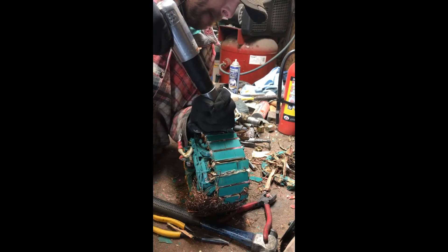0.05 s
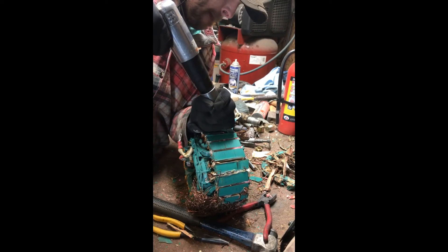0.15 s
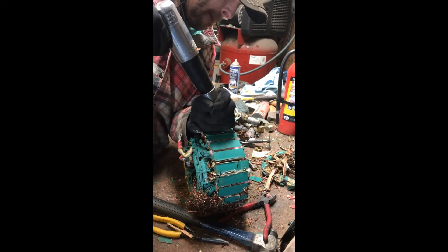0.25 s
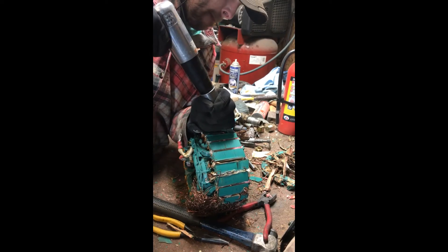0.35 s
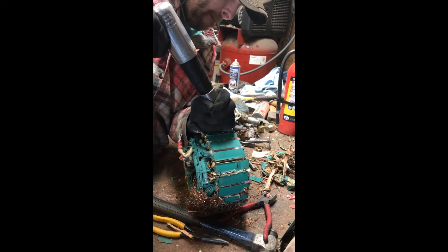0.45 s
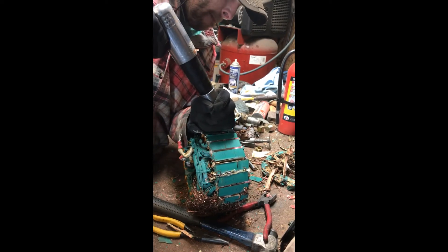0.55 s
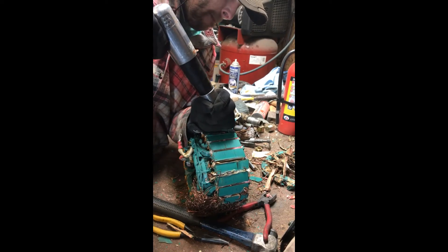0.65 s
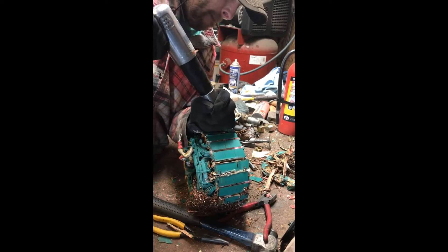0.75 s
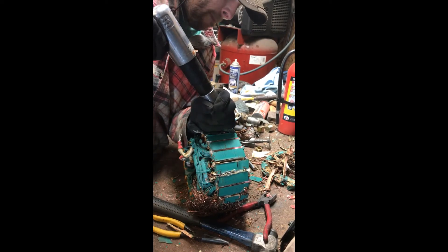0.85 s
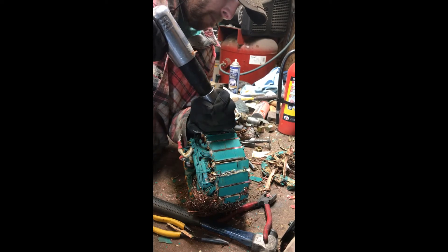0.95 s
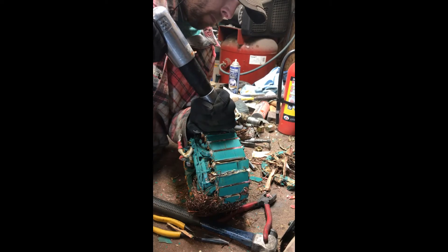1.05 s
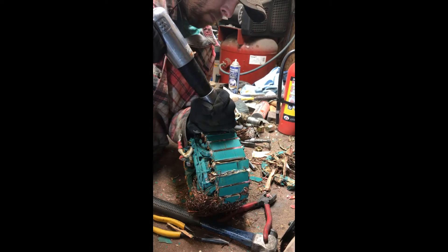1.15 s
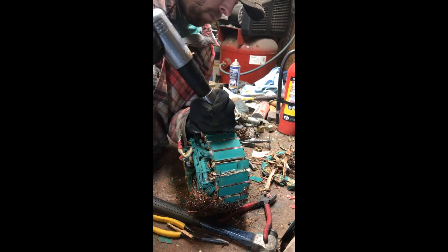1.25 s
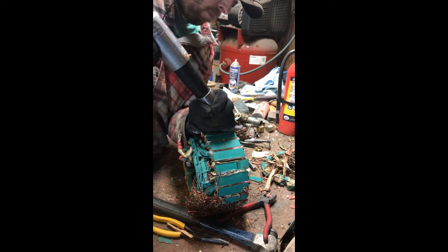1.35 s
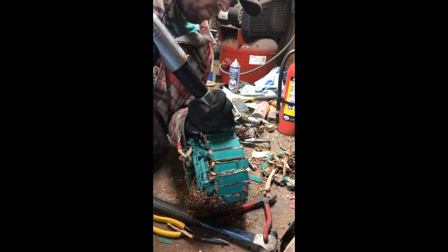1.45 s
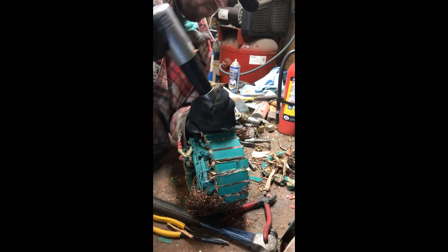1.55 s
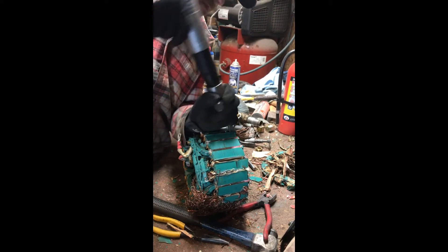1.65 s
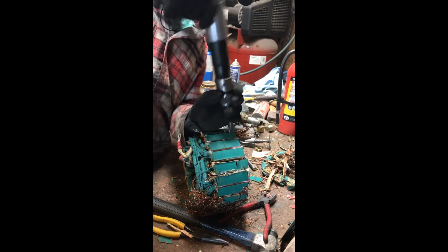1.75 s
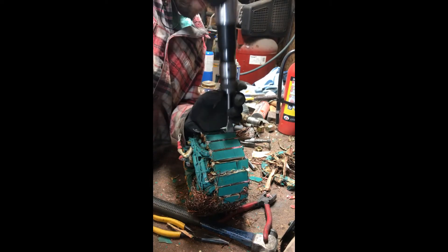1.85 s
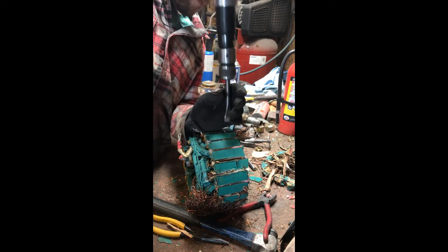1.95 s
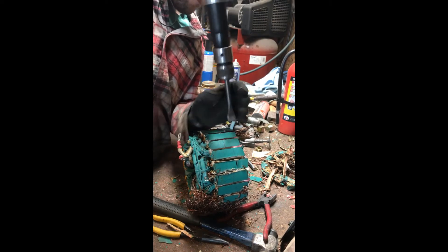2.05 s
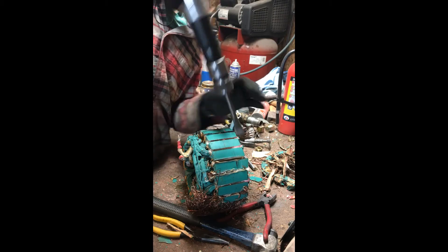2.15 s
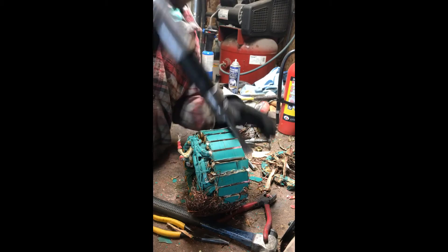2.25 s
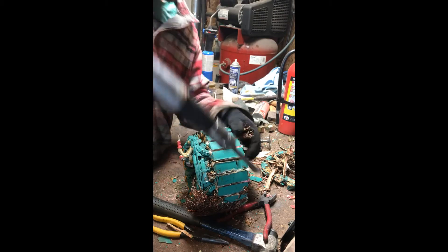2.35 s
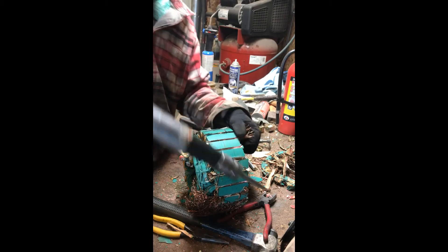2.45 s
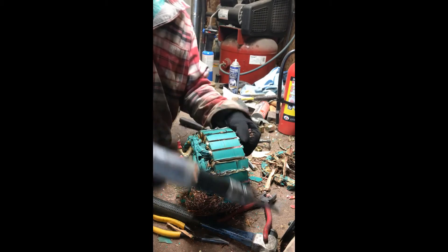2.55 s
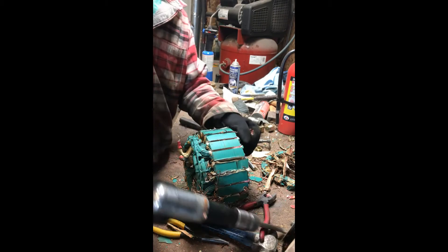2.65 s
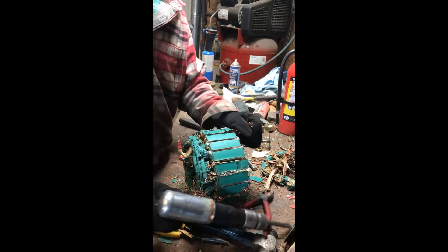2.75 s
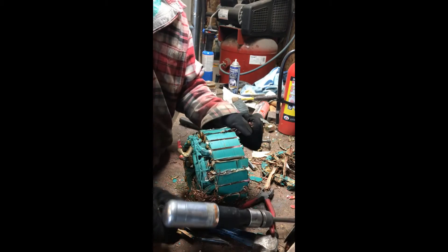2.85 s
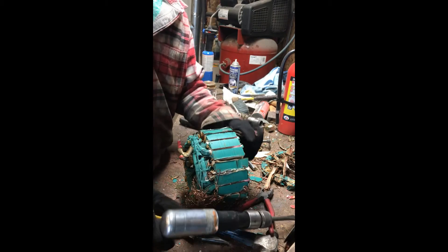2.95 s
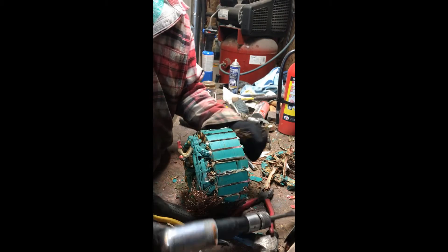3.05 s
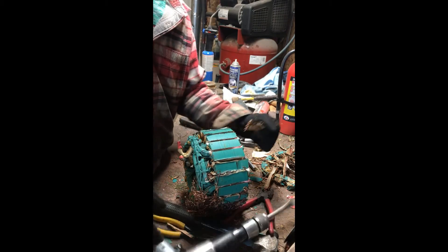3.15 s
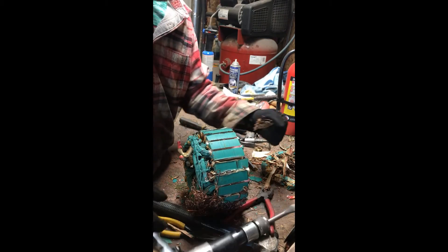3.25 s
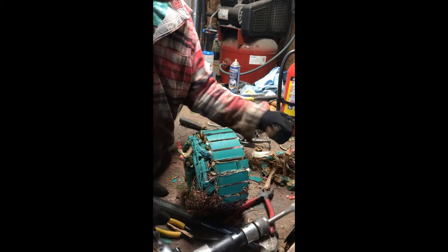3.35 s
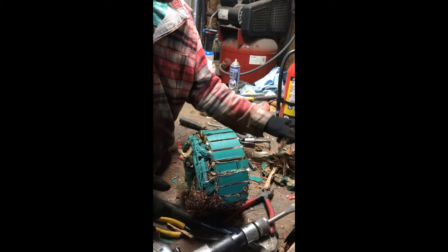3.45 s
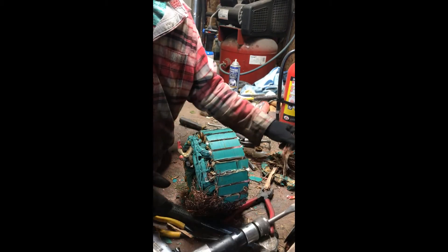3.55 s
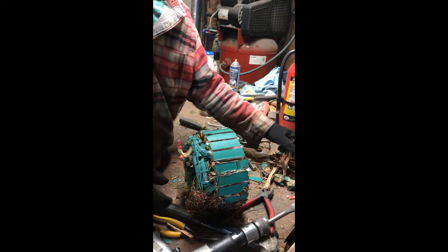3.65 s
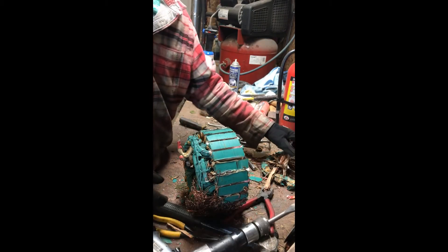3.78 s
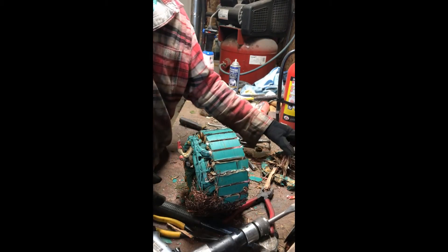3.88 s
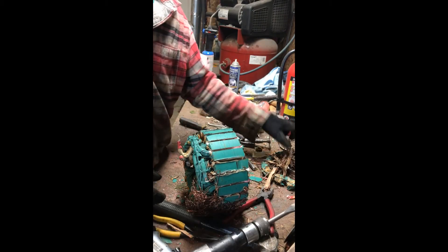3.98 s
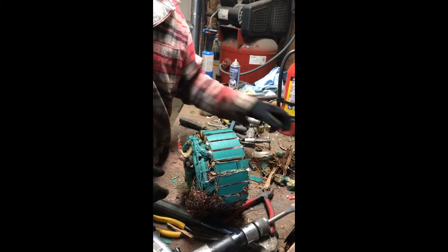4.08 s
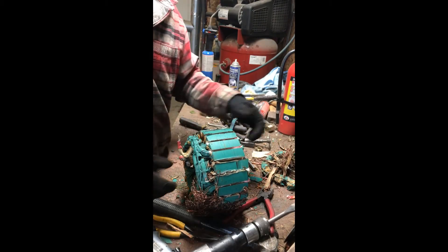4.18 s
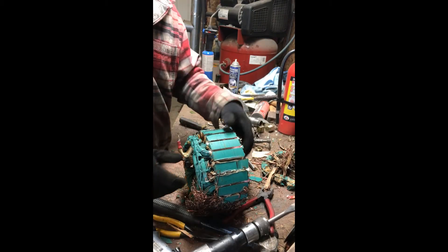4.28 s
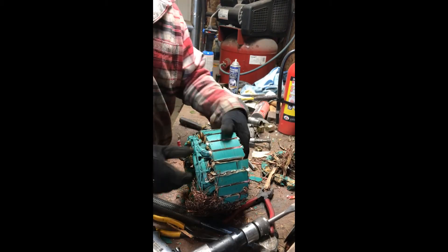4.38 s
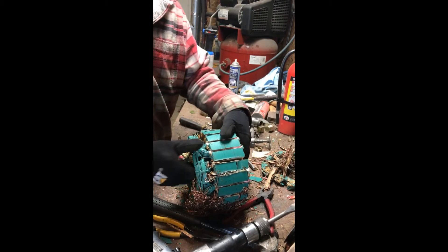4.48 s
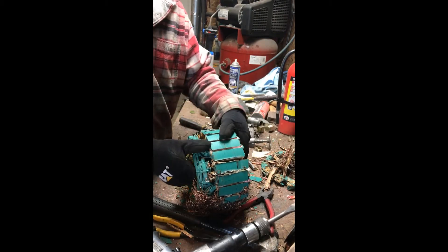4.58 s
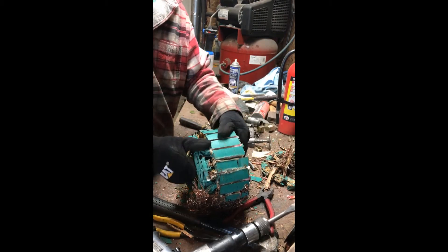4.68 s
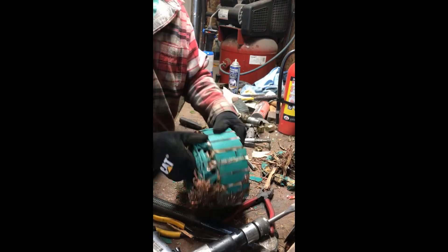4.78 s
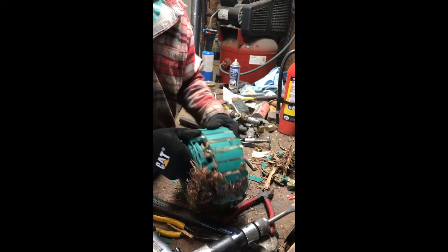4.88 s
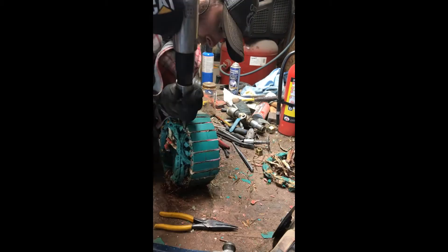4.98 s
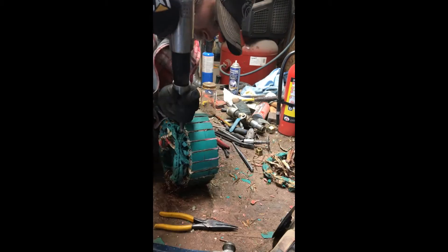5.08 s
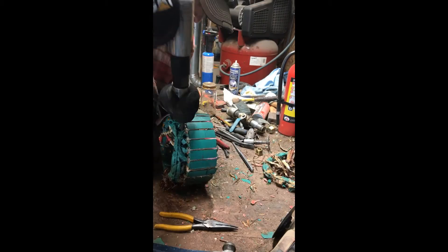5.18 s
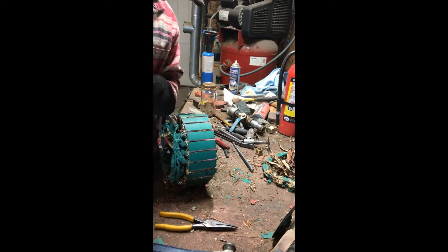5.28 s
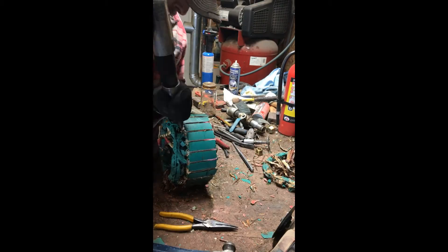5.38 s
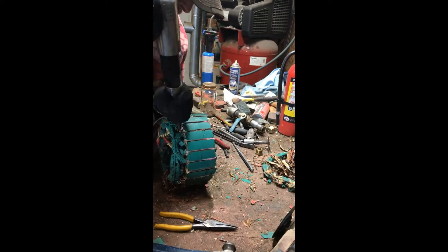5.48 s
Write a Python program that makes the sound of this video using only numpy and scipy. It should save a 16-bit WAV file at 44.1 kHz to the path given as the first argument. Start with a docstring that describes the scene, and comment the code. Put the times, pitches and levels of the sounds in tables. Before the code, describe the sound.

Loud, rapid pneumatic chiselling on metal windings stops abruptly; the tool clatters and thuds onto a wooden bench, then something heavy scrapes.

```python
"""An air hammer chatters against the copper windings of a motor stator on a workbench, then stops.
The loose chisel clinks in its holder, the tool is dragged and dropped on the bench, and the stator is shoved round.
Blows excite damped modes and decaying coloured noise; friction is a train of slips that rings the sliding body.
The workshop is small and dry, heard from close by; all sound ends just before five seconds."""
import sys
import numpy as np
from scipy import signal
from scipy.fft import rfft, irfft, next_fast_len
from scipy.io import wavfile
from scipy.ndimage import map_coordinates

SR = 44100
rng = np.random.default_rng(int(sys.argv[2]) if len(sys.argv) > 2 else 0)


def put_to_file(sound):
    """Save the sound as 16-bit audio at rate SR, in the file named by the first command-line argument."""
    columns = np.atleast_2d(sound).T  # one column per channel
    safe = np.clip(columns, -1, 1)
    whole_steps = np.round(safe * 32767)
    wavfile.write(sys.argv[1], SR, whole_steps.astype(np.int16))


N = 243429
TIME = np.arange(N) / SR  # s
AGE = np.arange(SR // 2) / SR  # s since a blow
BOOM_HZ = 66  # the bench's lowest mode
STROKE_SCATTER_DB = 0.9  # chance from stroke to stroke

# Dense ring of light metal contacts. Each row: frequency in Hz, relative density in dB per Hz.
CLACK_HIGH = [(2060, -51), (3500, -17), (4210, -10.5), (4540, -3.5), (5360, -8.5), (6280, -1.5),
              (7460, -4.5), (8580, -0.5), (9740, -8), (11900, -10.5), (13000, 0), (14100, -14.5),
              (16000, -10)]
# Dense ring of heavier metal contacts. Each row: frequency in Hz, relative density in dB per Hz.
CLACK_LOW = [(400, -14), (1200, -4), (2000, -4), (4000, -4.5), (6000, -14), (12000, -40.5)]


def amp(db):
    """Level to amplitude: 20 dB is a factor of ten."""
    return 10 ** (np.asarray(db) / 20)


def unit(x):
    """Normalisation: x scaled to rms 1."""
    return x / np.sqrt(np.mean(x ** 2) + 1e-20)


def along(points, hz):
    """Interpolation of (Hz, value) points on a logarithmic frequency axis."""
    f, v = np.transpose(points)
    return np.interp(np.log(hz + 1), np.log(f + 1), v)


def level(rows, axis=1):
    """Envelope: gain per sample from a dB column against time, silent outside the rows."""
    rows = np.asarray(rows)
    return amp(np.interp(TIME, rows[:, 0], rows[:, axis], left=-200, right=-200))


def colour(x, spectrum):
    """Linear filtering: x is weighted by a spectrum and scaled to rms 1."""
    size = next_fast_len(len(x))
    gain = amp(along(spectrum, np.fft.rfftfreq(size, 1 / SR)))
    return unit(irfft(rfft(x, size) * gain, size)[:len(x)])


def noise(spectrum, size=len(AGE)):
    """Coloured noise: white noise shaped by a spectrum, at rms 1."""
    return colour(rng.standard_normal(size), spectrum)


def wobble(rate):
    """Slow random modulation: a smooth curve through rate random knots a second."""
    knots = rng.standard_normal(int(N * rate / SR) + 4)
    return map_coordinates(knots, [TIME * rate])


def fade(t60, attack):
    """Exponential decay of 60 dB in t60 seconds, after a rise with time constant attack."""
    decay = np.exp(-np.log(1000) * AGE / max(t60, 1e-3))
    return decay * (1 - np.exp(-AGE / max(attack, 1e-5)))


def ring(modes, scatter_db, detune, attack, free=1):
    """Modal superposition: damped sines at scattered strengths and pitches; free scales the decay time."""
    total = 0
    for hz, db, t60 in modes:
        strength = amp(db + scatter_db * rng.normal())
        pitch = hz * (1 + detune * rng.normal())
        total = total + strength * fade(t60 * free, attack) * np.sin(2 * np.pi * pitch * AGE)
    return total


def add(track, s, sound):
    """Superposition: mix a sound into the track at s seconds."""
    start = max(round(s * SR), 0)
    track[start:start + len(sound)] += sound[:max(N - start, 0)]


def hammer():
    """Periodic impact: piston on chisel, tip into copper, rebound, exhaust puff, then the piston turns back."""
    # What every stroke rings in tool and stator. Each row: frequency in Hz, relative level in dB, t60 in s.
    body_modes = [(138.2, -5, 0.22), (166.2, -12, 0.22), (202.4, -5, 0.13), (234, -5.5, 0.079),
                  (284.2, 3, 0.049), (338, -25.5, 0.055), (486, -15, 0.16), (862, -9.5, 0.041),
                  (1193, -13, 0.042), (1307, -22, .04), (1851, -17.5, 0.089), (3540, -23, 0.065),
                  (3960, -20.5, 0.11), (12100, -14, 0.1)]
    # What the bite rings in the stator's iron. Each row: frequency in Hz, relative level in dB, t60 in s.
    iron_modes = [(404, -3, 0.073), (693.5, -8.5, 0.034), (935, -7.5, 0.068), (1196, -4.5, 0.11),
                  (1846, -0.5, .05), (2352, -7, 0.1), (3220, -7.5, 0.067), (3580, -6.5, 0.08),
                  (4150, -4.5, 0.086), (5270, -4, 0.13), (8380, -7.5, 0.076)]
    # Spectra of the strokes. Each row: frequency in Hz, relative density in dB per Hz.
    steel_blow = [(880, -26.5), (1500, -12), (1830, -1), (2120, -9.5), (2560, -11), (3590, -4), (4690, -11),
                  (6240, -3), (7610, -7.5), (8740, -2.5), (10300, -9.5), (12500, -3), (16000, -3)]
    copper_blow = [(150, -34), (400, 3.5), (600, -5), (720, -4.5), (880, 2.5), (1020, -2.5), (1250, 3),
                   (1900, -6), (2150, -8), (2450, -9.5), (4000, -5.5), (7000, -16.5), (16000, -26.5)]
    tip_bite = [(700, -20), (1500, -2), (2300, -9.5), (3800, -2.5), (5000, -5.5), (8000, -15.5),
                (16000, -17.5)]
    exhaust = [(300, -11.5), (900, 2.5), (2500, -3), (6500, -3), (9000, -3), (11000, -10.5), (16000, 1)]
    bite_s, rebound_s, return_s = 0.0037, 0.0059, 0.034  # after the piston lands

    out = np.zeros(N)
    steel, copper, bite, rebound, air = map(recurring, (steel_blow, copper_blow, tip_bite, steel_blow, exhaust))
    puff = np.exp(-0.5 * ((AGE - 0.018) / 0.004) ** 2)
    leak = np.exp(-0.5 * ((AGE - 0.028) / 0.012) ** 2)  # air that escapes later and more slowly
    puff = puff + amp(-7) * leak
    for s, db, thump_db, iron_db in strokes():
        add(out, s, amp(db - 1.5) * next(steel) * fade(t60=0.023, attack=0.0011))
        copper_db = -16.5 + STROKE_SCATTER_DB * rng.normal()
        add(out, s, amp(copper_db) * next(copper) * fade(t60=0.087, attack=0.002))

        # the tip's strike is a very short crack
        bite_db = 1 + 2 * rng.normal()
        add(out, s + bite_s, amp(bite_db) * next(bite) * fade(t60=0.0045, attack=0.00063))
        iron = ring(iron_modes, scatter_db=3, detune=0.003, attack=0.0003)
        add(out, s + bite_s, amp(iron_db) * iron)

        rebound_db = db - 5 + STROKE_SCATTER_DB * rng.normal()
        add(out, s + rebound_s, amp(rebound_db) * next(rebound) * fade(t60=0.018, attack=0.0008))
        add(out, s, amp(-23) * next(air) * puff)
        turn_back = amp(-31) * noise(CLACK_HIGH) * fade(t60=0.023, attack=0.0016)
        add(out, s + return_s + 0.0034 * rng.normal(), turn_back)

        # the recoil is alike every time, so the low modes build up on multiples of the stroke rate
        recoil = ring(body_modes, scatter_db=1.5, detune=0.001, attack=0.0008)
        add(out, s + 0.00073, -amp(thump_db + 4.5) * recoil)
        bench_boom = np.sin(2 * np.pi * BOOM_HZ * AGE) * fade(t60=0.47, attack=0.0021)
        add(out, s + 0.0024, -amp(-19) * bench_boom)
    return out


def strokes():
    """Phase integration: a stroke per whole turn, as (s, steel blow dB, recoil thump dB, iron ring dB)."""
    # The piston speeds up when the tool is leaned on, sags with the air pressure and slows as the trigger
    # is let go. Each row: time in seconds, rate in strokes a second.
    stroke_rate = [(0, 20.75), (.32, 21.01), (.37, 23.93), (.55, 23.86), (.9, 22.73), (1.37, 22),
                   (1.39, 19.8)]
    # How hard the tool is pressed home. Each row: time in seconds, then the relative levels in dB of the
    # steel blow, the recoil thump and the iron ring.
    press = [(0.102, -4, -19.5, -24), (.45, -0.5, -20, -22.5), (.95, -0.5, -21.5, -25.5),
             (1.35, -0.5, -21.5, -28)]
    # The windings give way and cushion the steel. Each row: time in seconds, change of the blow in dB.
    gives = [(.505, -9), (.589, -2.5), (.802, -5.5), (1.432, -4)]
    first_stroke_s, release_s = 0.0014, 1.45  # release of the trigger

    turns = np.cumsum(np.interp(TIME, *np.transpose(stroke_rate))) / SR
    whole_turns = np.arange(np.interp(release_s, TIME, turns))
    times = first_stroke_s + np.interp(whole_turns, turns, TIME)
    at, steel_db, thump_db, iron_db = np.transpose(press)
    steel = np.interp(times, at, steel_db) + STROKE_SCATTER_DB * rng.standard_normal(len(times))
    for s, db in gives:
        steel[np.argmin(np.abs(times - s))] += db
    return zip(times, steel, np.interp(times, at, thump_db), np.interp(times, at, iron_db))


def recurring(spectrum):
    """Correlated excitation: each dense burst is much like the last, drifting as the chisel digs in."""
    # How closely a ring repeats the one before. Each row: frequency in Hz, likeness from 0 to 1.
    likeness = [(400, .76), (3500, .76), (7000, .45), (14000, .25)]
    alike = along(likeness, np.fft.rfftfreq(len(AGE), 1 / SR))
    pattern = rfft(rng.standard_normal(len(AGE)))
    while True:
        fresh = rfft(rng.standard_normal(len(AGE)))
        pattern = alike * pattern + np.sqrt(1 - alike ** 2) * fresh
        yield colour(irfft(pattern, len(AGE)), spectrum)


def clinks():
    """Contact damping: chisel and holder ring briefly, damped by each other, the glove and the bench."""
    # The loose chisel touches its holder. Each row: start in seconds, relative level in dB, relative level
    # of the holder's ring in dB.
    touches = [(1.806, -27.5, -45), (1.886, -27, -46), (1.9066, -8, -42), (1.9346, -7, -17.5),
               (1.939, -9.5, -29), (1.955, -19, -45), (2.616, -30, -44), (2.666, -24.5, -37.5),
               (3.271, -23, -20), (3.356, -15.5, -21), (3.379, -14, -27), (3.427, -15, -37),
               (3.433, -15, -33)]
    # Modes of chisel and holder. Each row: frequency in Hz, relative level in dB, t60 in seconds
    # (for the chisel, when it rings freely).
    chisel_modes = [(4710, -39, 0.35), (9440, -2.5, 0.048), (11400, -14.5, 0.055), (12800, -7.5, 0.049),
                    (14920, -23, 0.09)]
    holder_modes = [(8440, -0.5, 0.045), (6100, -14.5, .035)]
    set_down_s = 2.6  # from here on the tool touches the bench
    free_in_air, free_on_bench = 0.93, 0.57  # share of the free ring time

    out = np.zeros(N)
    for s, db, holder_db in touches:
        free = free_in_air if s < set_down_s else free_on_bench
        tone = ring(chisel_modes, scatter_db=4.5, detune=0.00088, attack=0.0004, free=free)
        tick = amp(-3) * noise(CLACK_HIGH) * fade(t60=0.036, attack=0.0015)
        tick = tick + amp(-13) * noise(CLACK_LOW) * fade(t60=0.031, attack=0.00027)
        holder = ring(holder_modes, scatter_db=1, detune=0.0016, attack=0.0013)
        add(out, s, amp(db - 5) * (tone + tick) + amp(holder_db + 3.5) * holder)
    return out


def clacks():
    """High modal density: metal on metal gives a noise-like ring with barrel modes; heavier parts sound lower."""
    # Hard contacts of the tool and loose scrap. Each row: start in seconds, relative level in dB, relative
    # level of the lower band in dB, rise in seconds, t60 in seconds.
    contacts = [(1.5444, -22.5, 1, 0.00051, 0.037), (1.584, -39.5, 6.5, 0.0008, 0.057),
                (2.0896, -41, -5, 0.00076, 0.061), (2.104, -29.5, -11, 0.00049, 0.026),
                (2.4938, -8, -12, 0.011, 0.09), (2.5036, 0, -24.5, 0.0025, 0.035),
                (2.5208, -2, -15.5, 0.00073, 0.025), (2.53, -14.5, -13, 0.00078, 0.053),
                (2.6895, -1, -7.5, 0.00078, 0.017), (2.6983, -13, -0.5, 0.0012, 0.044),
                (2.7416, -26.5, 9, 0.00054, 0.021), (2.801, -31, -8, .0006, 0.067),
                (2.827, -31, -3, .0006, 0.096), (2.864, -34, -4, .001, 0.046),
                (2.917, -30.5, -3, .001, 0.051), (3.04, -31, -4, 0.00034, 0.07),
                (3.0979, -28.5, -5, .0006, 0.071), (3.1287, -23.5, -6.5, 0.00069, 0.035),
                (3.21, -15, 1.5, 0.00049, 0.018), (3.2125, -17.5, -12, .003, .04),
                (3.2162, -3, -18, 0.0014, .034), (3.243, -22.5, -23, 0.00056, 0.19),
                (3.311, -31, -12, .001, 0.032), (3.461, -30.5, -14, .0006, 0.064),
                (4.4423, -45, -2.5, 0.00055, 0.15), (4.4916, -33, -11, 0.00054, 0.049),
                (4.6853, -30, -8.5, 0.00049, 0.033), (4.698, -30, -5.5, 0.00052, 0.026),
                (4.751, -41, -4, .0006, 0.031), (4.886, -32.5, 1, 0.00091, 0.053),
                (4.899, -33.5, -2, .001, 0.063), (4.936, -36, -3, 0.00084, 0.043)]
    # The tool's steel body. Each row: frequency in Hz, relative level in dB, t60 in seconds.
    barrel_modes = [(6250, -5, 0.025), (8540, 0, 0.04), (12900, -5, 0.03)]
    out = np.zeros(N)
    for s, db, low_db, rise, t60 in contacts + rattles():
        dense = noise(CLACK_HIGH) + amp(low_db + 3.5) * noise(CLACK_LOW)
        barrel = amp(-15.5) * ring(barrel_modes, scatter_db=7.5, detune=0.004, attack=0.00092)
        add(out, s, amp(db - 4) * (dense * fade(t60, rise) + barrel))
    return out


def rattles():
    """Random impact train: light contacts at uneven times in each spell, as rows for clacks()."""
    # Loose scrap is jostled. Each row: start in seconds, length in seconds, relative level in dB, relative
    # level of the lower band in dB.
    spells = [(1.841, .05, -34, -2), (3.047, 0.05, -39, -5), (3.714, .26, -48.5, -28),
              (4.4, 0.047, -36, -4.5)]
    contacts_per_s, scatter_db, rise_s, t60_s = 32, 0.5, 0.00044, 0.062
    rows = []
    for start, length, db, low_db in spells:
        count = max(round(length * contacts_per_s), 1)
        times = start + length * (np.arange(count) + rng.random(count)) / count
        rows += [(s, db + scatter_db * rng.normal(), low_db, rise_s, t60_s) for s in times]
    return rows


def knocks():
    """Impact on a plate: a blow slaps the bench top, rings its boards and thumps its frame; heavy ones bounce."""
    # Blows on the bench. Each row: start in seconds, relative level in dB, relative level of the slap in dB,
    # centre of the slap in Hz, relative level of the thump in dB.
    blows = [(1.78, -34, -7, 1040, -20), (2.34, -43.5, 6, 1590, -21.5), (2.419, -23.5, -1.5, 1520, -21.5),
             (2.691, -8, -8.5, 800, -8.5), (2.779, -34.5, -14, 1160, 11), (2.916, -26.5, -15, 1501, -15.5),
             (2.957, -32.5, -13.5, 945, -2.5), (3.213, -9.5, -11, 600, -16.5), (3.236, -2.5, -6, 900, -14),
             (3.352, -7.5, -12.5, 830, -19), (3.425, -19.5, -23, 689, -25), (4.222, -33.5, -12.5, 710, -25),
             (4.686, -42.5, -3, 900, -14)]
    # Modes of the boards. Each row: frequency in Hz, relative level in dB, t60 in seconds.
    board_modes = [(239, -4.5, 0.16), (298.3, 0.5, 0.1), (336.8, -2.5, 0.13), (387, 1.5, 0.11),
                   (440, -3, 0.099), (526.4, -1.5, 0.098), (623, -14.5, 0.11), (870, -14, 0.048)]
    # Spectrum of the slap. Each row: multiple of its centre frequency, relative density in dB per Hz.
    slap_shape = [(.2, -17.5), (.55, -1), (1, 3), (1.5, -5), (2.4, -13), (4, -24.5), (11, -29.5)]
    frame_modes = [(133.6, 0.3, 0.22), (165.3, -3.5, 0.15)]  # Hz, relative dB, t60 in s
    heavy_db = -12  # blows above this bounce once, softer and duller
    bounce_s, bounce_loss_db, bounce_dull_db = 0.02, 14.5, 16.5

    out = np.zeros(N)
    bounces = [(s + bounce_s, db - bounce_loss_db, slap_db - bounce_dull_db, hz, thump_db)
               for s, db, slap_db, hz, thump_db in blows if db > heavy_db]
    for s, db, slap_db, slap_hz, thump_db in blows + bounces:
        boards = amp(-4.5) * ring(board_modes, scatter_db=1.5, detune=0.049, attack=0.003)
        spectrum = [(k * slap_hz, gain_db) for k, gain_db in slap_shape]
        slap = amp(slap_db + 2) * noise(spectrum) * fade(t60=0.083, attack=0.001)
        thump = amp(thump_db + 5.5) * ring(frame_modes, scatter_db=1.5, detune=0.0057, attack=0.0061)
        add(out, s, amp(db) * (boards + slap + thump))
    return out


def slips(rate):
    """Stick-slip excitation: about rate random impulses a second, whose strength swells and sinks."""
    happens = rng.random(N) < rate / SR
    return rng.standard_normal(N) * happens * amp(3.8 * wobble(rate=90))


def drags():
    """Stick-slip friction: the dropped tool slides and rocks on the gritty bench; slips ring its steel."""
    # The tool skids after a landing and comes to rest. Each row: start in seconds, relative level of the
    # rumble in dB, relative level of the grit in dB, rise of the grit in seconds, its t60 in seconds.
    skids = [(2.712, -26, -27.5, .005, 0.36), (2.79, -48, -39, 0.022, .2), (2.847, -44, -20, 0.018, .1),
             (2.861, -50.5, -21.5, 0.0023, .05), (2.908, -33, -29.5, .004, 0.14),
             (3.262, -46.5, -40.5, .005, 0.28), (3.352, -31, -60, .005, .26),
             (3.424, -31.5, -47, .005, .26)]
    # Spectra of rocking and scraping. Each row: frequency in Hz, relative density in dB per Hz.
    rumble = [(59, -37.5), (100, 6.5), (124, 1), (252, 3), (355, 5), (506, 3), (654, -29), (858, -6.5),
              (1700, -13.5), (2390, -35.5), (3000, -29), (3900, -44), (6600, -120)]
    grit = [(880, -55), (1500, -14.5), (2370, -5.5), (2690, -20), (4200, -3.5), (5070, -19.5), (12100, -13),
            (16000, -32.5)]
    # What the tool's steel sings with. Each row: frequency in Hz, relative level in dB, t60 in seconds.
    steel_modes = [(2030, 0.5, .025), (2390, 3.5, .035), (2730, -4, .015), (3400, -8, .03),
                   (4260, -1, 0.025), (5780, -1.5, 0.025), (8300, -9, 0.021)]

    rocking, sliding = np.zeros(N), np.zeros(N)
    for s, rumble_db, grit_db, rise, t60 in skids:
        add(rocking, s, amp(rumble_db) * fade(t60=0.49, attack=0.0046))
        add(sliding, s, amp(grit_db) * fade(t60, rise))
    steel = ring(steel_modes, scatter_db=5, detune=0.003, attack=0.0004)
    singing = signal.fftconvolve(slips(rate=420), steel)[:N]
    scrape = amp(-5) * colour(slips(rate=3800), grit) + amp(-2.5) * unit(singing)
    return rocking * colour(slips(rate=1200), rumble) + sliding * scrape


def shove():
    """Continuous friction: the heavy stator scrapes round, its dense, even slips ringing its own modes."""
    # The stator slides. Each row: time in seconds, relative level in dB.
    slide = [(4.76, -67), (4.805, -49), (4.838, -41), (4.855, -30), (4.90, -26), (4.945, -28), (4.98, -49)]
    # Spectrum of the scrape. Each row: frequency in Hz, relative density in dB per Hz.
    scrape = [(24, -42), (40, -21), (67, 4), (91, -41), (128, 3.5), (257, -11), (298, 1), (676, -17),
              (1060, -22), (1420, -34), (2640, -40), (3140, -37), (4450, -30), (4910, -32), (15000, -55)]
    # Stator on the boards. Each row: frequency in Hz, relative level in dB, t60 in seconds.
    judder_modes = [(312, 0, 0.07), (400, -4, 0.04), (1060, -4.5, 0.055), (1750, -16, .05),
                    (2100, -16, 0.05), (2600, -9, 0.045), (3390, -19, .04), (4320, -19, .03)]
    modes = ring(judder_modes, scatter_db=2, detune=0, attack=0.00041)
    judder = signal.fftconvolve(rng.standard_normal(N), modes)[:N]
    return level(slide) * (amp(-2.5) * noise(scrape, size=N) + amp(-3) * unit(judder))


def boom():
    """Lowest-mode resonance: the bench swells whenever weight shifts on it, holds and dies away."""
    # Weight shifts on the bench. Each row: start in seconds, level in dB, hold in seconds.
    shifts = [(2.519, -30.5, 0.078), (2.663, -26.5, 0.0042), (2.774, -29, 0.024), (2.927, -32, 0.043),
              (3.227, -28, 0.021), (3.417, -24.5, .025), (3.583, -43, 0.02)]
    rise_s, fall_db_per_s = 0.041, 219
    swell = np.zeros(N)
    for s, db, hold in shifts:
        fall_db = fall_db_per_s * np.maximum(TIME - s - rise_s - hold, 0)
        rise = np.clip((TIME - s) / rise_s, 0, 1)
        swell = np.maximum(swell, amp(db - fall_db) * rise)
    hz = BOOM_HZ + 1.6 * wobble(rate=3.6)
    return swell * unit(np.sin(2 * np.pi * np.cumsum(hz) / SR))


def workshop(x):
    """Diffuse reverberation: convolution with a short noise tail, weak in the deep bass."""
    # Decay of the room. Each row: frequency in Hz, t60 in seconds.
    room_t60 = [(100, 0.51), (500, 0.51), (2000, 0.34), (8000, 0.087), (16000, 0.14)]
    reflections = noise([(90, -28.5), (300, -1.5), (1500, -5), (5000, -4), (16000, -1)])  # Hz, dB per Hz
    hz, t, z = signal.stft(reflections, SR, nperseg=256)
    decay = np.exp(-np.log(1000) * t / along(room_t60, hz)[:, None])
    tail = signal.istft(z * decay, SR, nperseg=256)[1]
    delayed = np.pad(tail, (SR // 200, 0))  # 5 ms before the first reflection
    return signal.fftconvolve(x, delayed / np.linalg.norm(tail))[:N]


def background():
    """Stationary noise and a frequency-modulated tone: quiet workshop air with a thin, slowly rising whine."""
    # The whine. Each row: time in seconds, centre frequency in Hz, mean level in dB.
    whine_path = [(1.5, 14010, -66), (2.3, 14200, -66), (3.3, 14300, -64), (3.6, 14700, -70.5),
                  (4.72, 15000, -68), (4.8, 15350, -65), (4.96, 15400, -66)]
    # Spectrum of the air. Each row: frequency in Hz, relative density in dB per Hz.
    air = [(15, -57.5), (25, -24), (43, -5.5), (92, -5), (127, -8), (242, -7.5), (439, -11), (1160, -12.5),
           (2410, -18.5), (3250, -20), (5880, -24.5), (14400, -29), (16000, -36.5)]
    # Course of the air's level. Each row: time in seconds, mean level in dB.
    ambience = [(0, -46), (1.7, -49), (2.1, -56.5), (3.7, -54), (4.05, -58), (4.6, -57), (4.95, -51)]
    hz = np.interp(TIME, *np.transpose(whine_path)[:2]) + 45 * wobble(rate=250) + 50 * wobble(rate=7)
    whine = level(whine_path, axis=2) * amp(3 * wobble(rate=6)) * np.sin(2 * np.pi * np.cumsum(hz) / SR)
    return level(ambience) * amp(0.27 * wobble(rate=10)) * noise(air, size=N) + whine


def scene():
    """Superposition of direct and reverberant sound, in one channel."""
    tool = hammer()
    metal = clinks() + clacks()
    wood = knocks() + drags() + shove()
    room = workshop(amp(-14) * tool + amp(-10) * metal + amp(-13) * wood)
    return (tool + metal + wood + room + boom() + background())[None]


def record(dry):
    """Soft saturation and band limiting: peaks round off at full scale, and the sound fades out quickly."""
    end_s, fade_db_per_s, top_hz = 4.955, 1400, 15780
    rounded = dry / (1 + np.abs(dry) ** 6) ** (1 / 6)
    live = amp(-np.clip((TIME - end_s) * fade_db_per_s, 0, 200))
    low_pass = signal.firwin(301, top_hz, fs=SR, window="blackman")
    return signal.fftconvolve(rounded * live, low_pass[None], mode="same", axes=1)


dry = scene()
out = record(dry)
put_to_file(out)
```